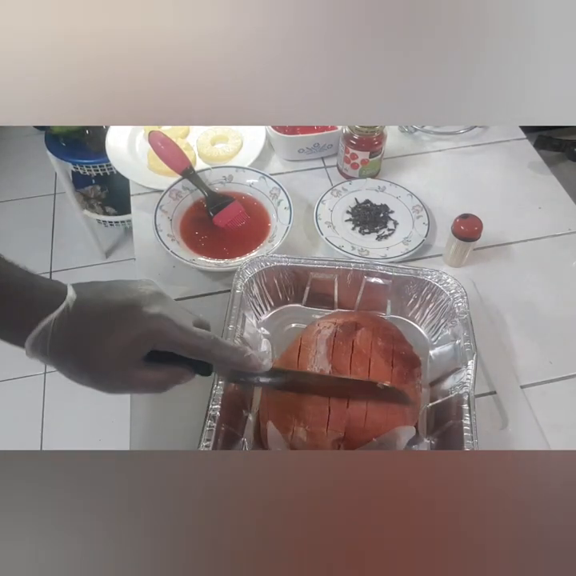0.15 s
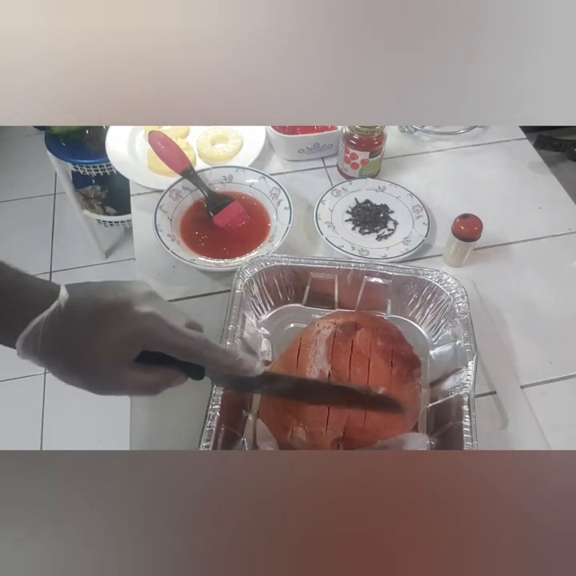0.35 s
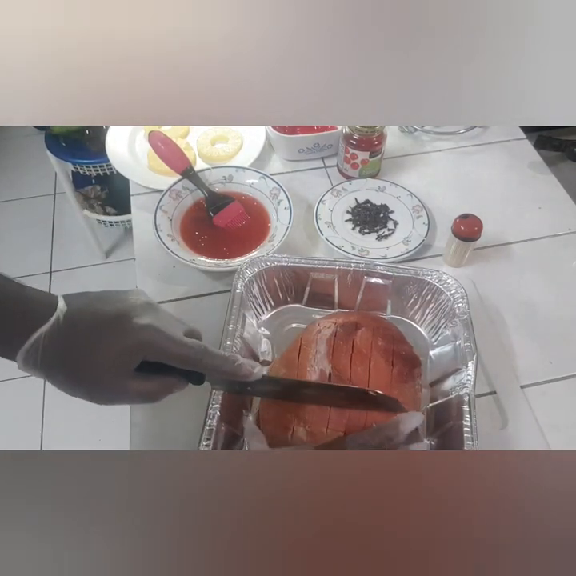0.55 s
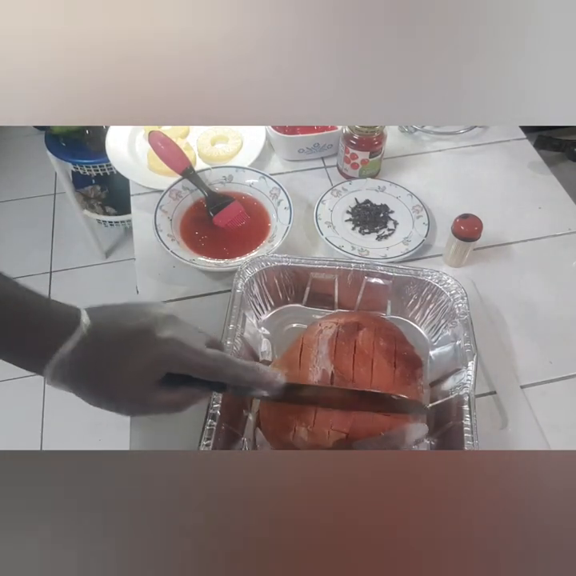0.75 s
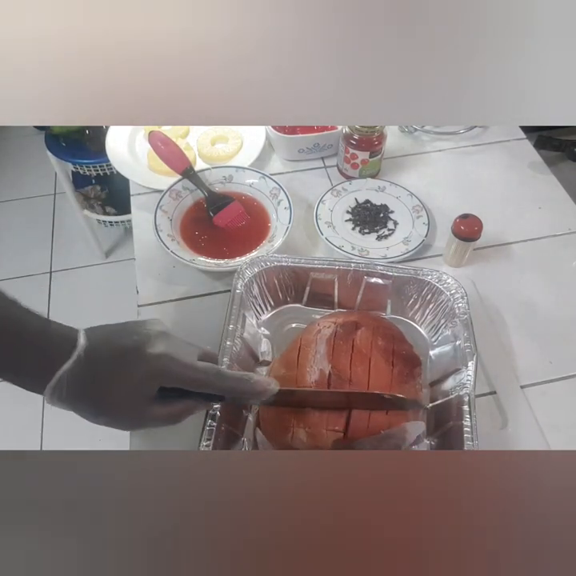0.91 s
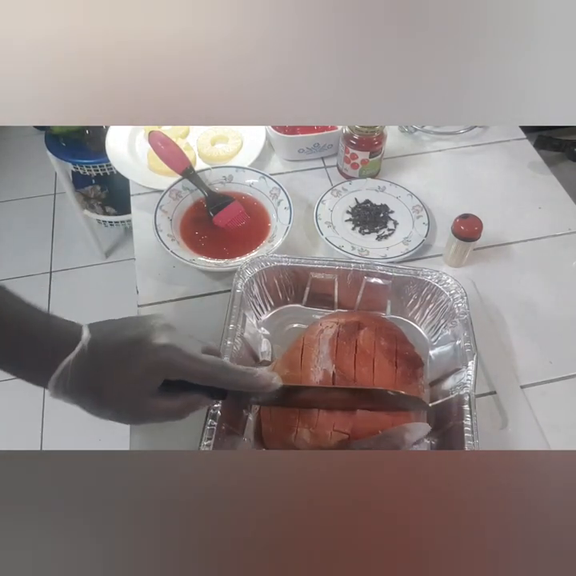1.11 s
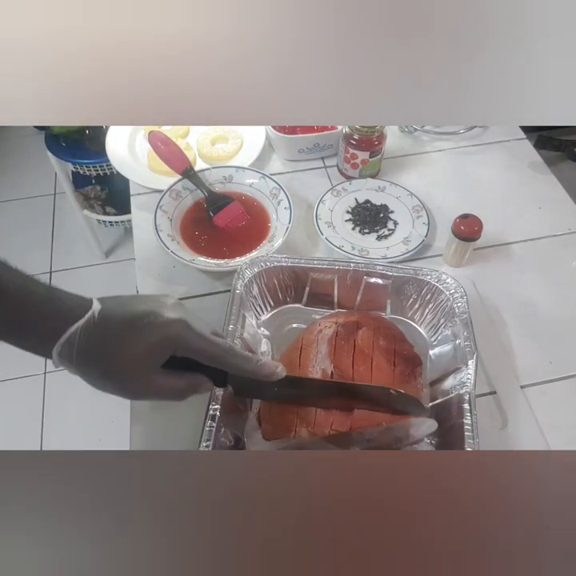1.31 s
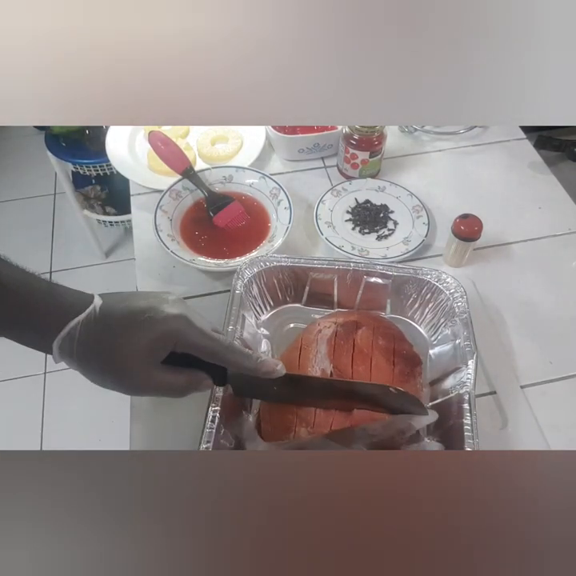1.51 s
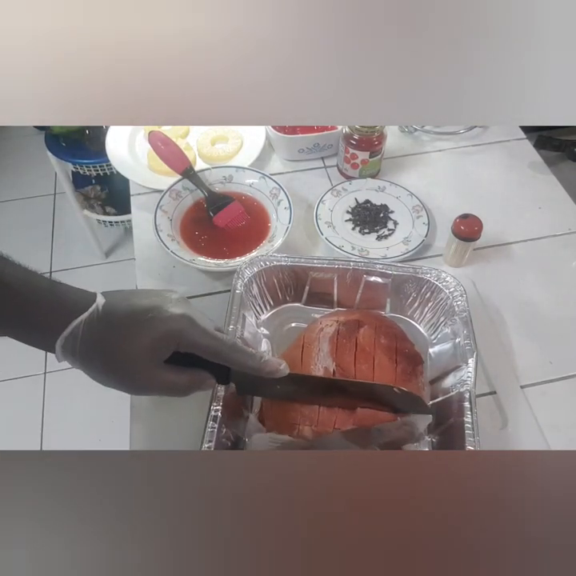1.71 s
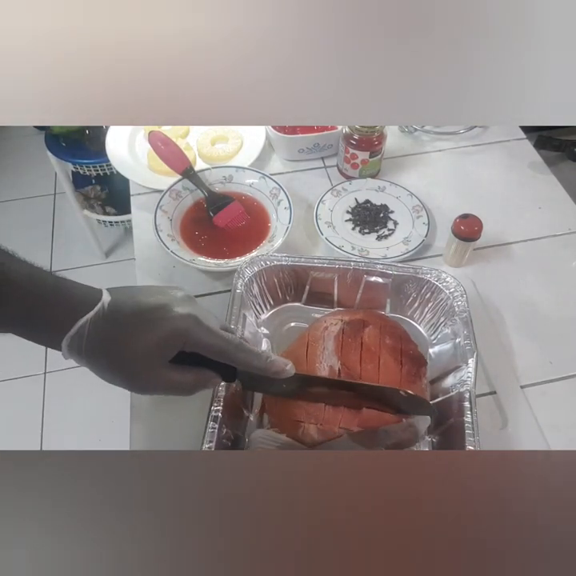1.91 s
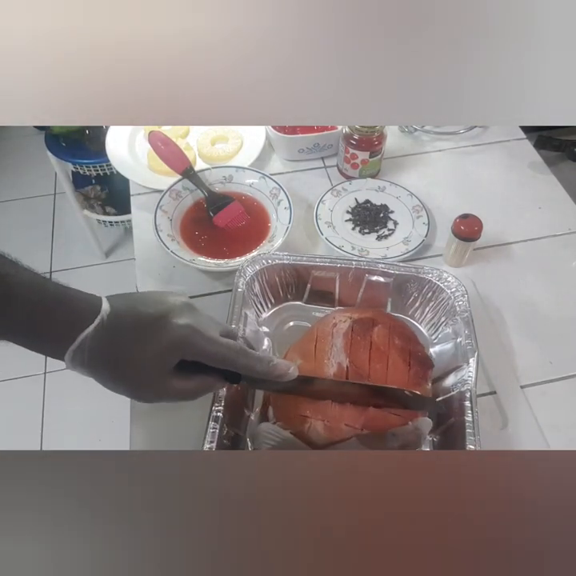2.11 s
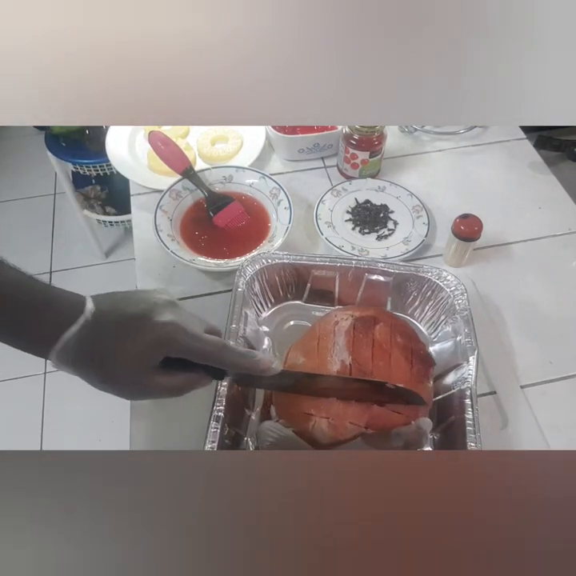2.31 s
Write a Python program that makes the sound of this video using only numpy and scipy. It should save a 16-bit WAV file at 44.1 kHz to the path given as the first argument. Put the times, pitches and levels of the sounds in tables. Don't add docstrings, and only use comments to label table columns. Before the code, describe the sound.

Foil tray knocks under a knife cutting ham: faint blade tinks at 0.1 s, a sharp knock at 0.2, the loudest, brightest crack at 0.43. Soft wet slicing and ticks follow; a scrape and dull clattering knock at 1.15-1.4, a firm knock at 1.5, a crisp pop at 1.69, lighter knocks at 2.0-2.1, faint slicing after. Close stereo phone, tiled kitchen, steady low hum and airy hiss.

```python
import sys
import numpy as np
from scipy import signal
from scipy.fft import rfft, irfft, next_fast_len
from scipy.io import wavfile
from scipy.ndimage import uniform_filter1d, map_coordinates

SR = 44100
rng = np.random.default_rng(int(sys.argv[2]) if len(sys.argv) > 2 else 0)


def nominal_scale(level):
    x = np.asarray(level, float) / 20
    return 10 ** x


def wav_out(sig):
    wavfile.write(sys.argv[1], SR, np.round(np.clip(np.atleast_2d(sig).T, -1, 1) * 32767).astype(np.int16))


N = 103635

# (frequency [Hz], level [dB])
TICK_COLOUR = [(600, -50), (1500, -7), (3000, -0.5), (7000, -8), (9000, -4.5), (13000, 5), (15500, -9),
               (16800, -1.5)]
PATCHY_DB = 1.3
MAINS_HZ = 99.82
TICK_ROOM_DB = -3.5


def foil(centre_hz, mode_hz, mode_db, bright_db, rise_s, narrow=1, count=70):
    # (frequency over the centre [ratio], level [dB])
    mode_levels = [(.15, -33), (.3, -13), (.6, -4), (1.05, 2), (1.6, 1), (2.5, -4.5), (5, -15), (12, -42)]
    # (frequency [Hz], t60 [s])
    mode_t60 = [(300, 0.22), (1000, 0.15), (3000, 0.077), (8000, 0.019), (15000, .03)]
    # (frequency [Hz], level [dB])
    edge_colour = [(1500, -9), (4000, 0.5), (7000, 1.5), (12000, -1), (16000, -10.5)]
    spread, mode_cycles = 0.82, 80
    t = np.arange(SR // 6) / SR
    draw = rng.random((count, 4))
    hz = centre_hz * 2 ** (5 * (np.arange(count) + draw[:, 0]) / count - 2.5)
    strength = nominal_scale(along(mode_levels, (hz / centre_hz) ** narrow) + 2.8 * draw[:, 1])
    decay = nominal_scale(-60 * t / along(mode_t60, hz)[:, None])
    gain = strength[:, None] * decay
    apart = spread * np.sqrt(hz / 1000) * (2 * draw[:, 3] - 1)
    phase = 2 * np.pi * (hz[:, None] * t + draw[:, 2:3])
    ring = np.array([np.sum(gain * np.sin(phase + side * apart[:, None]), 0) for side in (1, -1)])
    ring = ring / np.abs(ring).max()
    ring = ring + nominal_scale(mode_db - 60 * t * mode_hz / mode_cycles) * np.sin(2 * np.pi * mode_hz * t)
    snap = 1 + 1.76 * np.exp(-t / 0.0037)
    edge = burst(edge_colour, t60=0.046, rise_s=0.00094)[:, :len(t)]
    return ring * (1 - np.exp(-t / rise_s)) * snap + nominal_scale(bright_db + 10) * edge


def knocks():
    # (time [s], peak [dB], centre [Hz], strongest mode [Hz], brightness [dB])
    hits = [
        (.223, -8.5, 1637, 2220, -30),
        (.43, -4, 2005, 2083, -17),
        (1.2349, -8.5, 1098, 1640, -42),
        (1.296, -24.5, 1520, 4190, -27),
        (1.5, -11, 1736, 1020, -31.5),
        (1.518, -19.5, 1111, 1044, -33),
        (2.004, -16.5, 1678, 2500, -28),
        (2.012, -21, 1603, 1565, -40),
        (2.067, -13, 1561, 1936, -27),
    ]
    out = np.zeros((2, N + SR))
    for s, db, hz, mode_hz, bright_db in hits:
        add(out, s - .0004, nominal_scale(db - 4.5) * foil(hz, mode_hz, -11, bright_db, rise_s=0.00099))
    return out[:, :N]


def panels():
    ringing = [(.222, [(782, -24, 0.1), (1086, -13.5, 0.028), (1500, -24, 0.082), (2076, -18, 0.06),
               (1855, -27, 0.047), (2640, -23, .07), (3140, -31.5, 0.14)]), (0.4302, [(631, -31, 0.25),
               (1131, -16, 0.11), (1820, -19.5, 0.062), (2092, -12, 0.042), (2576, -16.5, 0.045),
               (3680, -27, 0.035), (4500, -28, 0.053)]), (.556, [(624, -37, 0.13), (888, -30, 0.1),
               (1060, -35.5, .1)]), (1.139, [(710, -36, 0.022), (1050, -32, 0.027), (2020, -38, 0.017)]),
               (1.151, [(765, -44, 0.026), (1202, -28.5, 0.034), (2390, -40, 0.082), (2110, -43, .12)]),
               (1.234, [(326, -32, 0.094), (865, -17, 0.053), (1200, -19, 0.048), (1590, -17, 0.076),
               (2170, -25, 0.033)]), (1.294, [(318, -40, 0.23), (998, -30.5, 0.29), (1315, -32, 0.046),
               (1760, -43, 0.14)]), (1.5, [(637, -43, .15), (986, -31.5, 0.33), (1032, -17.5, 0.066),
               (1423, -25, .05), (1762, -20.5, 0.052)]), (1.5163, [(309, -43, 0.41), (1296, -22, 0.055)]),
               (2.0045, [(1676, -26, 0.053), (2565, -31, 0.035), (3340, -30.5, 0.026), (4800, -38, .02)]),
               (2.0123, [(990, -31, 0.064), (1686, -22, 0.041)]), (2.0668, [(424, -35, 0.032),
               (1367, -21, 0.06), (1870, -26, 0.038), (2460, -32, 0.061), (3000, -36.5, 0.11),
               (3470, -29, 0.058)])]
    waver, apart = 0.54, .45
    out, t = np.zeros((2, N + SR)), np.arange(SR // 3) / SR
    sides = np.array([[1], [-1]])
    for s, modes in ringing:
        ring = 0
        for hz, db, t60 in modes:
            phase = 2 * np.pi * hz * t + waver * wobble(63, size=len(t))
            phase = phase + apart * sides * rng.standard_normal()
            ring = ring + nominal_scale(db - 60 * t / max(t60, .01)) * np.sin(phase)
        add(out, s, ring * (1 - np.exp(-t / 0.00094)))
    return out[:, :N]


def rattles():
    # (time [s], peak [dB], centre [Hz])
    settlings = [(0.233, -18, 1113), (.369, -35, 986), (.433, -9, 2005), (.556, -24.5, 865),
                 (.566, -27.5, 926), (.919, -37, 576), (1.001, -33, 1009), (1.141, -28, 1086),
                 (1.16, -22, 1170), (1.25, -12.5, 1095), (1.311, -22, 930), (1.325, -31, 898),
                 (1.337, -22.5, 792), (1.368, -30.5, 958), (1.394, -28.5, 632), (1.501, -16, 1824),
                 (1.556, -48, 1000), (2.068, -52, 423), (1.736, -43, 988), (2.109, -25, 1517),
                 (2.281, -35.5, 1190)]
    out = np.zeros((2, N + SR))
    for s, db, hz in settlings:
        add(out, s - .002, nominal_scale(db - 2) * foil(hz, hz, -7, -56, rise_s=0.012, narrow=1.43, count=36))
    return out[:, :N]


def drags():
    # (start [s], length [s], level [dB])
    slides = [
        (.33, 0.12, -47.5),
        (.9, 0.3, -62),
        (1.11, 0.12, -46.5),
        (1.2, 0.06, -33.5),
        (1.25, 0.21, -45),
        (1.54, 0.14, -60),
        (2.09, 0.19, -58),
    ]
    # (frequency [Hz], level [dB])
    drag_colour = [(200, 1.5), (400, -3.5), (700, 6.5), (1050, 2), (1800, -9), (3500, -13), (6000, -23.5)]
    return pressure(slides, edge=0.79) * nominal_scale(0.84 * wobble(100)) * rush(drag_colour, PATCHY_DB)


def thud():
    out, t = np.zeros((2, N + SR)), np.arange(SR // 4) / SR
    body = np.sin(2 * np.pi * 71 * t) + nominal_scale(0.5) * np.sin(2 * np.pi * 299.4 * t)
    swell = nominal_scale(-36 - 60 * t / 0.28) * (1 - np.exp(-t / 0.005))
    out[:, round(1.225 * SR):][:, :len(t)] += swell * body
    return out[:, :N]


def slices():
    # (start [s], length [s], level [dB])
    cuts = [(0.068, 0.086, -70), (.54, .13, -56.5), (0.742, 0.07, -59), (.86, 0.092, -64.5),
            (.95, 0.11, -60), (1.11, 0.043, -57.5), (1.16, .11, -48), (1.26, 0.048, -54.5),
            (1.366, 0.11, -63), (1.52, 0.094, -61), (1.598, 0.096, -56.5), (1.685, 0.069, -69),
            (2.075, 0.062, -56), (2.19, 0.23, -62.5)]
    # (frequency [Hz], level [dB])
    slice_colour = [(2000, -31), (4000, -2.5), (6500, -8), (8200, -5.5), (10000, -4), (12500, 0),
                    (16000, -6)]
    grit_db = 0.91 * wobble(40.05) + 1.5 * wobble(470)
    return pressure(cuts, edge=0.16) * nominal_scale(grit_db) * rush(slice_colour, PATCHY_DB)


def ticks():
    # (time [s], peak [dB], t60 [s])
    releases = [(.7565, -59, 0.021), (0.771, -49, .006), (.777, -55, .008), (.79, -50, .012),
                (.798, -58, 0.009), (.8295, -51, .01), (.909, -56, .01), (.921, -51, .008),
                (0.966, -54, .012), (.984, -59, .01), (1.125, -50, 0.027), (1.1568, -31.5, 0.049),
                (1.278, -44, 0.016), (1.2945, -50, 0.025), (1.3935, -50, 0.014), (1.439, -58, .01),
                (1.686, -32, 0.0054), (1.686, -39, 0.026), (1.718, -60, 0.012), (2.03, -45, .01),
                (2.11, -47, .03), (2.207, -54, 0.022), (2.221, -49, .008), (2.25, -58, .008),
                (2.2775, -59, 0.008), (2.301, -57, 0.014), (2.3227, -52.5, 0.012)]
    out = np.zeros((2, N + SR))
    for s, db, t60 in releases:
        add(out, s, nominal_scale(db + 4.5) * burst(TICK_COLOUR, t60, rise_s=0.00023), TICK_ROOM_DB)
    return out[:, :N]


def pops():
    # (time [s], frequency [Hz], peak [dB], half length [s])
    cracks = [
        (1.1575, 12500, -33, .0003),
        (1.6861, 13500, -24, .0003),
        (1.6861, 8000, -36, .0003),
        (2.0685, 12000, -42, .0003),
    ]
    out, t = np.zeros((2, N + SR)), np.arange(-100, 100) / SR
    for s, hz, db, half_s in cracks:
        phase = 2 * np.pi * hz * t + rng.uniform(0, 1, (2, 1))
        bell = np.exp(-(t / half_s) ** 2)
        add(out, s + t[0], nominal_scale(db) * bell * np.cos(phase), TICK_ROOM_DB)
    return out[:, :N]


def tinks():
    # (time [s], peak [dB])
    touches = [
        (0.0774, -31.5),
        (0.101, -32),
    ]
    # (frequency [Hz], level [dB], t60 [s])
    blade = [(11400, -4, 0.056), (12000, -8, 0.022), (12480, 0, 0.05), (13590, -3, 0.066), (14350, -6, .03),
             (15400, -5, 0.032)]
    out, t = np.zeros((2, N + SR)), np.arange(SR // 10) / SR
    for s, db in touches:
        ring = 0
        for hz, level, t60 in blade:
            mode_db = level + rng.normal(0, 3.2, (2, 1)) - 60 * t / min(t60, .08)
            ring = ring + nominal_scale(mode_db) * np.sin(2 * np.pi * (hz * t + rng.random((2, 1))))
        contact = burst(TICK_COLOUR, 0.07, rise_s=0.0012)[:, :len(t)]
        add(out, s, nominal_scale(db - 9.5) * ring * (1 - np.exp(-t / 0.0013)) + nominal_scale(db - 12.5) * contact)
    return out[:, :N]


def hums():
    # (multiple of the mains hum [ratio], multiple of the fan [ratio], level [dB], pan [dB])
    hum_parts = [(1, 0, -54, 0), (0, 1, -51, .1), (2, 0, -56.5, .3), (1, 1, -67, .4)]
    # (frequency [Hz], level [dB], pan [dB])
    whine_tones = [(484.4, -57, -5.5), (554, -71, -2), (325.5, -79.5, 13)]
    fan_hz, beat_s = 112.65, .0525
    t, sides = np.arange(N) / SR - beat_s, np.array([[.5], [-.5]])
    out = 0
    for m, k, db, pan_db in hum_parts:
        level = nominal_scale(db + pan_db * sides + .7 * wobble(5.05))
        out = out + level * np.cos(2 * np.pi * (m * MAINS_HZ + k * fan_hz) * t)
    for hz, db, pan_db in whine_tones:
        level = nominal_scale(db + pan_db * sides + 2.2 * wobble(9.24))
        out = out + level * np.sin(2 * np.pi * hz * t + 2.2 * wobble(6.9))
    return out


def lamp():
    t, sides = np.arange(N) / SR, np.array([[.5], [-.5]])
    cycle = MAINS_HZ / 2 * t - .93
    spit = np.exp(6 * (np.cos(2 * np.pi * cycle) - 1))
    drift = 1.5 * np.array([wobble(700), wobble(700)])
    return nominal_scale(-62 + 2.5 * wobble(23.5) + 3.5 * sides) * spit * np.sin(2 * np.pi * 13400 * t + drift)


def air():
    # (frequency [Hz], level [dB])
    air_colour = [(25, -13), (60, -5.5), (150, -3), (250, -10.5), (500, -7), (1900, -11.5), (3500, -22.5),
                  (4500, -74)]
    # (frequency [Hz], level [dB])
    hiss_colour = [(2000, 8.5), (3200, -1.5), (5000, -5.5), (6900, 1.5), (8200, -18.5), (10500, -7.5),
                   (13500, -5.5), (16000, -10.5)]
    moving = nominal_scale(-49.5 + 0.11 * wobble(5.8)) * rush(air_colour, PATCHY_DB)
    return moving + nominal_scale(-56) * rush(hiss_colour, PATCHY_DB)


def add(out, s, sound, room_db=-2):
    # (frequency [Hz], t60 [s])
    kitchen_t60 = [(250, 0.97), (1000, 0.6), (4000, 0.5), (12000, 0.34)]
    feed_s, delay_s = .004, .006
    hz, t, z = signal.stft(rng.standard_normal((2, SR // 2)), SR, nperseg=256)
    fade = nominal_scale(-60 * t / along(kitchen_t60, hz)[:, None])
    tail = signal.istft(z * fade, SR, nperseg=256)[1]
    crack = sound * np.exp(-np.arange(sound.shape[1]) / SR / feed_s)
    wet = nominal_scale(room_db) * signal.fftconvolve(crack, tail / np.linalg.norm(tail[0]), axes=1)
    for at, part in ((s, sound), (s + delay_s, wet)):
        out[:, round(at * SR):][:, :part.shape[1]] += part


def pressure(table, edge):
    now = np.arange(N) / SR
    total = 0
    for s, length, db in table:
        to_end = np.minimum(now - s, s + length - now)
        total = total + nominal_scale(db) * np.clip(to_end / (edge * length / 2), 0, 1)
    return total


def burst(spectrum, t60, rise_s):
    t = np.arange(SR // 5) / SR
    noise = unit(filtered(rng.standard_normal((2, len(t))), lambda hz: nominal_scale(along(spectrum, hz))))
    return noise * nominal_scale(-60 * t / max(t60, .003)) * (1 - np.exp(-t / rise_s))


def rush(spectrum, patchy_db):
    # (frequency [Hz], left-right likeness [correlation])
    alike = [(60, 0.91), (180, 1), (550, 0.42), (1650, -0.15), (4970, 0.029), (15000, 0.009)]
    z = signal.stft(rng.standard_normal((2, N)), nperseg=512)[2]
    field = uniform_filter1d(rng.standard_normal(z.shape[1:]), size=6, axis=0)
    field = uniform_filter1d(field, size=10, axis=1)
    pair = signal.istft(z * nominal_scale(patchy_db * unit(field)), nperseg=512)[1][:, :N]

    def mid_side(hz):
        turn = np.arccos(np.clip(along(alike, hz), -1, 1)) / 2
        return nominal_scale(along(spectrum, hz)) * np.array([np.cos(turn), np.sin(turn)])

    mid, side = filtered(pair, mid_side)
    return unit(np.array([mid + side, mid - side]))


def unit(x):
    return x / np.sqrt(np.mean(x ** 2) + 1e-20)


def along(points, hz):
    f, v = np.transpose(points)
    return np.interp(np.log(hz + 1e-3), np.log(f), v)


def wobble(rate, size=N):
    knots = rng.standard_normal(int(size * rate / SR) + 4)
    return map_coordinates(knots, [np.arange(size) * rate / SR])


def filtered(x, response):
    n = x.shape[-1]
    m = next_fast_len(n + 4096)
    return irfft(rfft(x, m) * response(np.fft.rfftfreq(m, 1 / SR)), m)[..., :n]


def scene():
    tray = knocks() + panels() + rattles() + drags() + thud()
    knife = slices() + ticks() + pops() + tinks()
    return tray + knife + hums() + lamp() + air()


def top_cut(x):
    return signal.sosfilt(signal.butter(12, 16700, fs=SR, output="sos"), x)


def record(dry):
    # (frequency [Hz], level [dB])
    mic_colour = [(30, -14), (45, 0), (7200, 0), (8300, -4), (9800, 0), (15750, 0), (15850, -38),
                  (16650, -40), (16750, -120)]
    x = dry / (1 + np.abs(dry / .75) ** 4) ** (1 / 4)
    mix = filtered(x, lambda hz: nominal_scale(along(mic_colour, hz)))
    return top_cut(mix)


dry = scene()
out = record(dry)
wav_out(out)
```